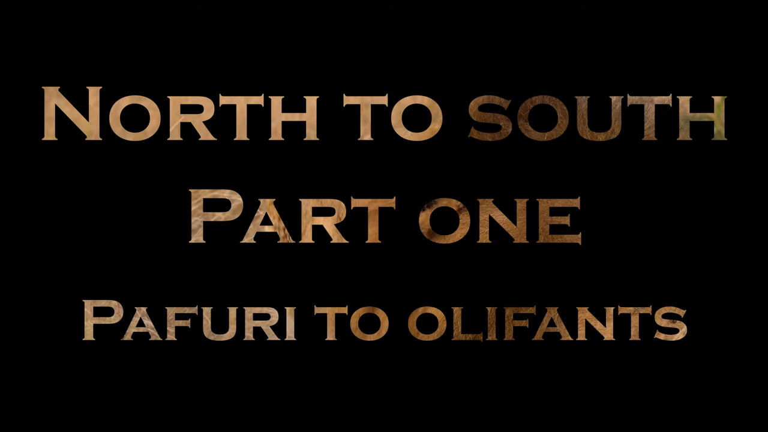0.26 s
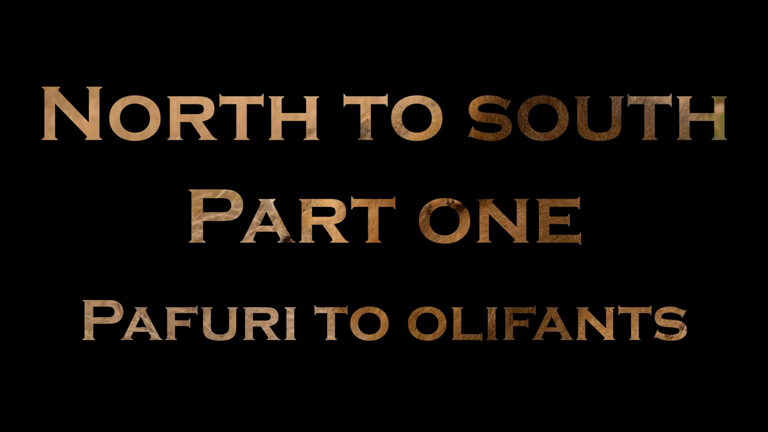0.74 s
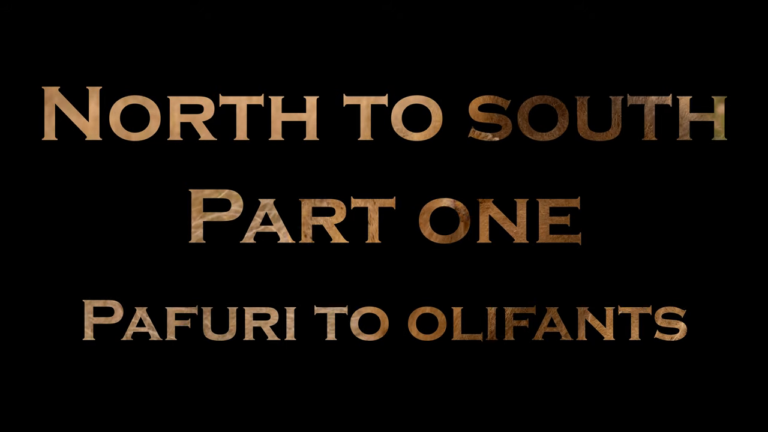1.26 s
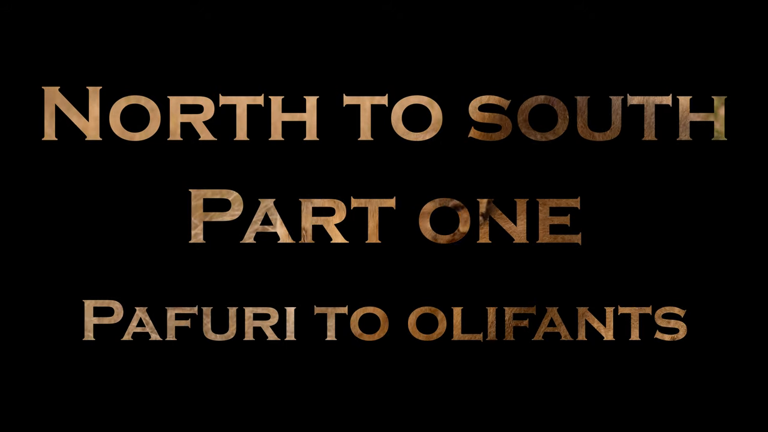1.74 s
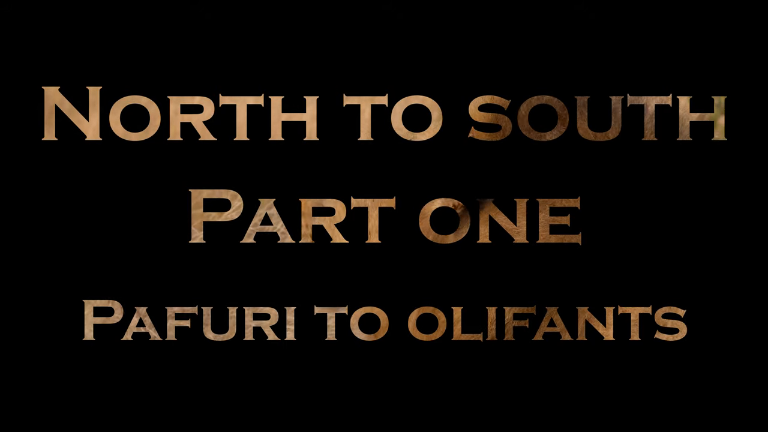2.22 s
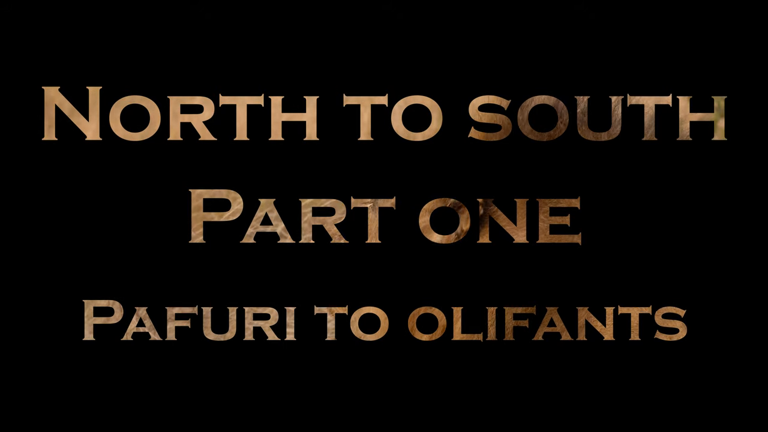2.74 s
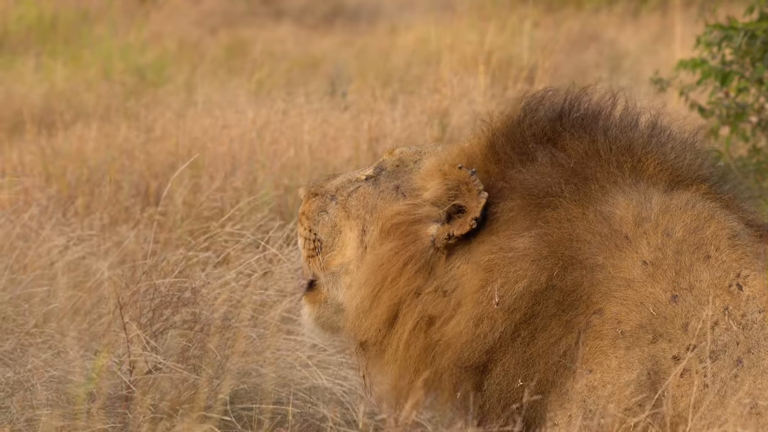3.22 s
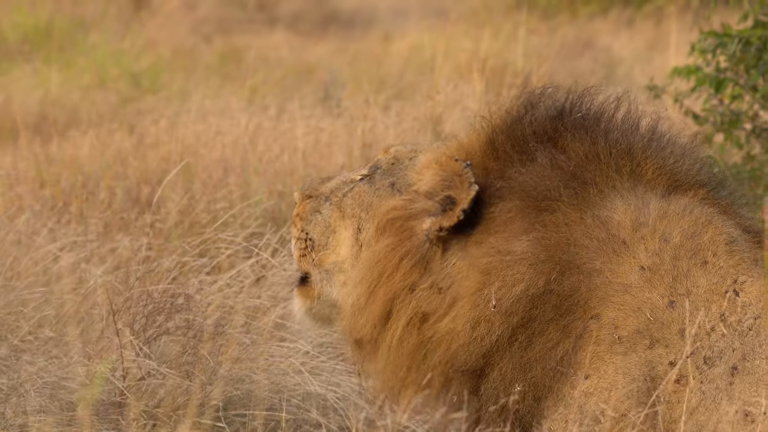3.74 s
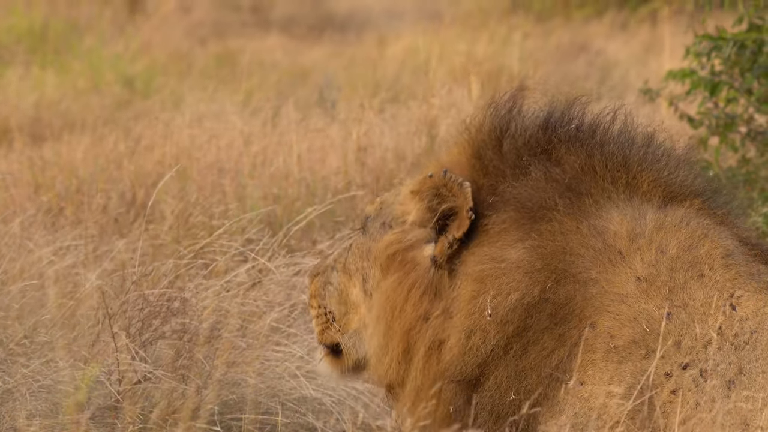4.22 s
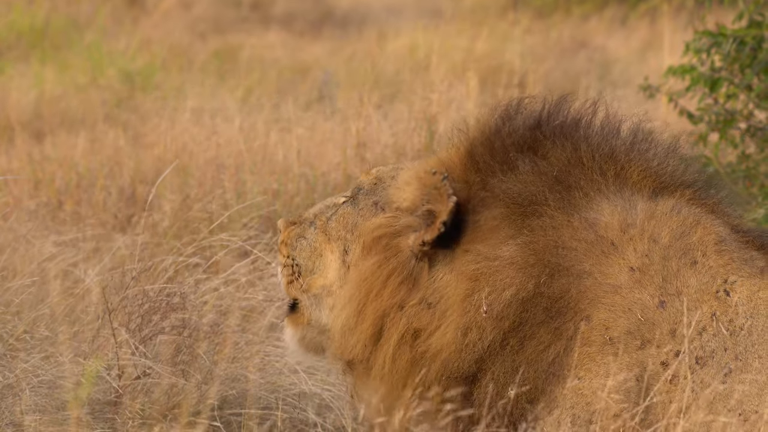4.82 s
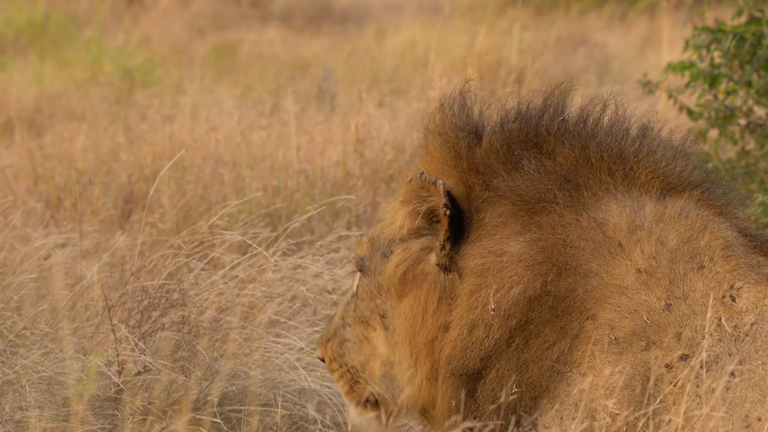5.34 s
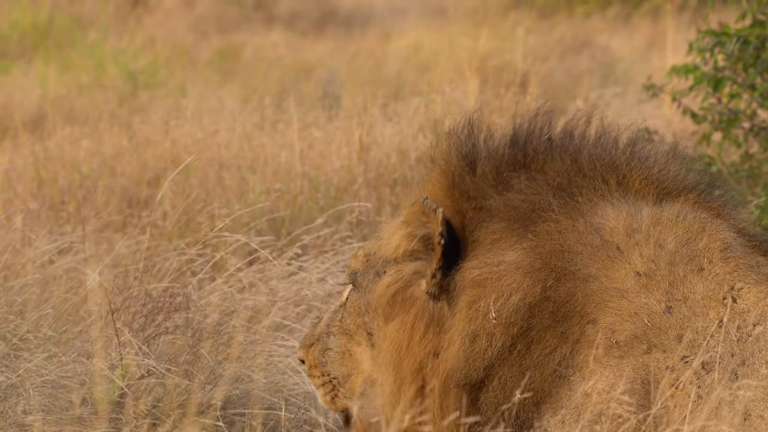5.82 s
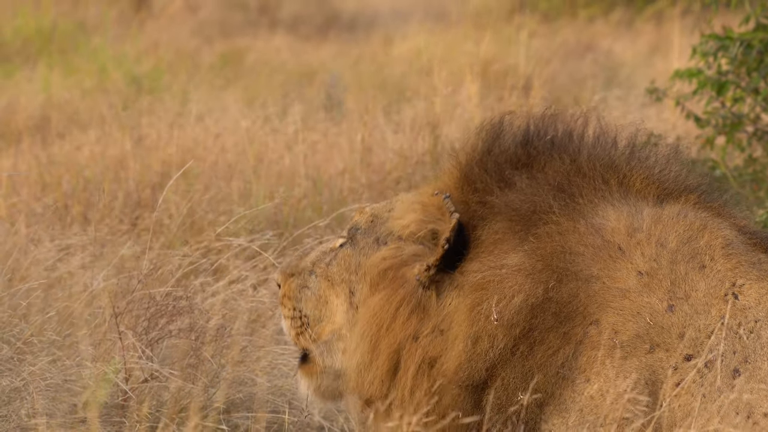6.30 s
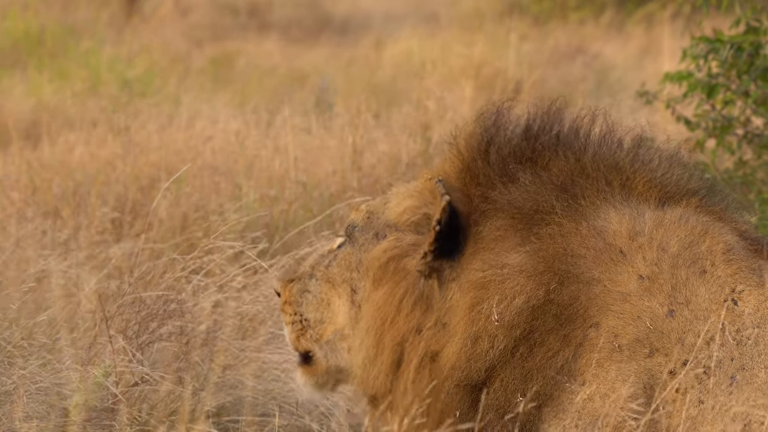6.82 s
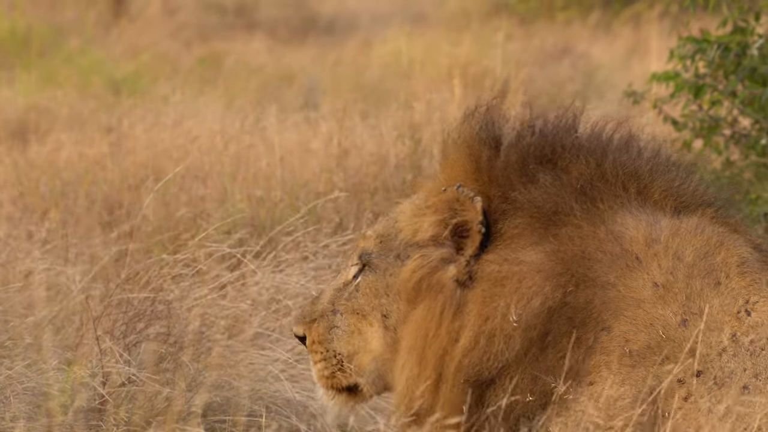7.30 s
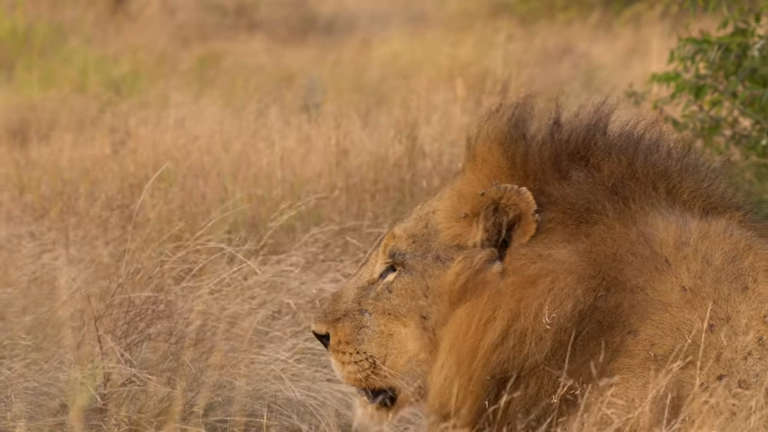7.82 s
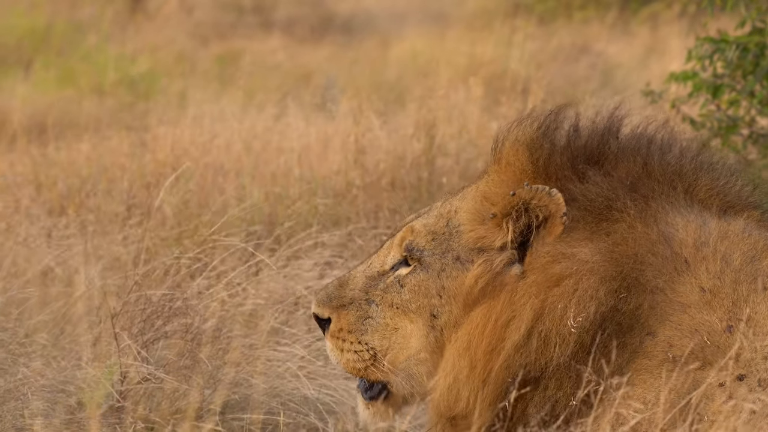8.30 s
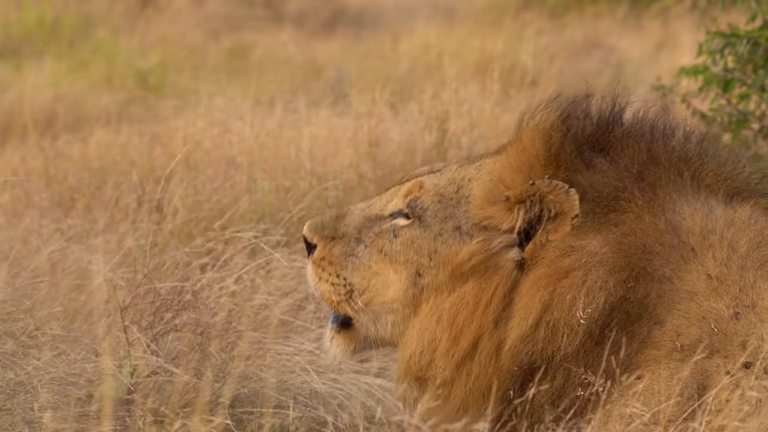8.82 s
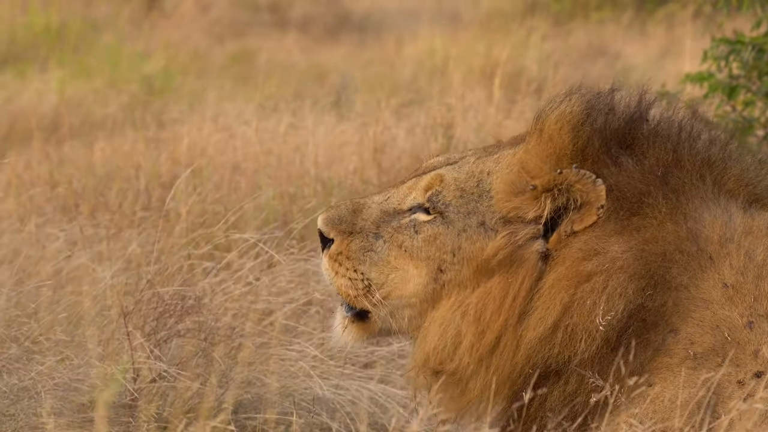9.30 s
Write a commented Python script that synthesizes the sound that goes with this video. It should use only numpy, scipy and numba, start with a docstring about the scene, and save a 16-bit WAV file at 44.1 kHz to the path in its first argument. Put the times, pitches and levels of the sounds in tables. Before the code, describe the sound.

Outdoors in open dry grassland, a male lion a few metres from the microphone calls steadily: a short grunt, then powerful low roars that swell fast, growl roughly and sag in pitch. Softer grunts and faint hoarse breaths fill the gaps. Low wind thumps the microphone now and then over a very faint hiss; late on, one tiny far bird chirp and a dry tick. A soft moan leads into the last rough roar.

```python
"""Open dry grassland: a male lion roars, grunts and once moans softly, a few metres from the microphone.
The vocal folds give a strong fundamental, pulses with doubled periods and a rough growl; resonators of a long
throat, mouth and upper tract filter them; bursts in the growl come with brief, slightly falling sine tones.
Low filtered noise and decaying swings make the wind on the microphone, over a faint bush hiss shaped from noise,
one far chirp of gliding sine and one tick of decaying noise."""
import sys
import numpy as np
from scipy import signal
from scipy.fft import rfft, irfft
from scipy.io import wavfile
from scipy.ndimage import uniform_filter1d
from numba import njit

SR = 44100
rng = np.random.default_rng(int(sys.argv[2]) if len(sys.argv) > 2 else 0)


def wav_record(signal):
    """Record a signal, one row per channel, as 16-bit PCM in the file named by sys.argv[1]."""
    frames = np.transpose(np.atleast_2d(signal))
    bounded = np.clip(frames, -1, 1)
    # unit amplitude maps onto the largest positive 16-bit level
    quanta = np.round(bounded * 32767).astype(np.int16)
    wavfile.write(sys.argv[1], SR, quanta)


N = 421155
TIME = np.arange(N) / SR
ROUGHEST = .86  # roughness 0-1 of the fully cracked voice and of the breaths
THROAT_SAG = -0.58  # change of the throat resonance factor per unit of pitch sag
THROAT_KNEE_DB = -24.5  # the throat fills up at this level of the fundamental


def undb(db):
    """Decibels to amplitude ratio: 20 dB a factor of ten."""
    return 10 ** (np.asarray(db) / 20)


def unit(x, seconds=None):
    """Power normalisation to rms 1, over the whole or over a sliding stretch."""
    power = np.mean(x ** 2) if seconds is None else uniform_filter1d(x ** 2, int(seconds * SR))
    return x / np.sqrt(power + 1e-18)


def curve(rows):
    """Linear interpolation in time of every column after the first, which holds seconds."""
    s, *columns = np.transpose(rows)
    return [np.interp(TIME, s, c) for c in columns]


def walk(rate):
    """Slow random modulation: levels held 1 / rate s and smoothed twice; spread near 1."""
    k = int(SR / rate)
    held = np.repeat(rng.standard_normal(N // k + 1), k)
    return 1.3 * uniform_filter1d(uniform_filter1d(held, k), k)[:N]


def band(x, lo_hz, hi_hz, order=2):
    """Band-pass filtering with a maximally flat pass band."""
    return signal.sosfilt(signal.butter(order, [lo_hz, hi_hz], "band", fs=SR, output="sos"), x)


@njit
def svf(x, hz, width):
    """Damped resonance: a state-variable band-pass with a moving centre, gain 1 at the centre."""
    y, b, l = np.empty(len(x)), 0., 0.
    for i in range(len(x)):
        g, k = np.tan(np.pi * hz[i] / SR), width / hz[i]
        v = (b + g * (x[i] - l)) / (1 + g * (g + k))
        b, l, y[i] = 2 * v - b, l + 2 * g * v, k * v
    return y


def ring(x, modes, stretch=np.ones(N), wander=0):
    """Modal superposition with alternating signs; each centre follows the stretch and wanders alone."""
    out = 0
    for k, (hz, width_hz, db) in enumerate(modes):
        centre = hz * stretch * (np.exp(wander * walk(14)) if wander else 1)
        # two passes leave dark valleys; each is widened to make up for the narrowing
        once = svf(x, centre, 1.44 * width_hz)
        out = out + (-1) ** k * undb(db) * svf(once, centre, 1.44 * width_hz)
    return out


def clicks(phase, size):
    """Impulse excitation: a click at each wrap of the phase, shared between two samples."""
    cycle = np.floor(phase).astype(int)
    at = np.flatnonzero(np.diff(cycle)) + 1
    late = (phase[at] - cycle[at]) / (phase[at] - phase[at - 1])
    out = np.zeros(N)
    out[at - 1] += size[at] * late
    out[at] += size[at] * (1 - late)
    return out


def bush():
    """Stationary coloured noise: the grassland's faint hiss, most alike in both ears in the bass."""
    # spectrum of the hiss, joined on a logarithmic frequency axis: (frequency [Hz], relative level [dB])
    spectrum = [(18, -45.5), (30, -25), (121, 3.5), (285, -20.5), (1180, -19), (1340, -27), (2220, -20.5),
                (3080, -27.5), (3770, -31.5), (12700, -34.5), (16500, -62.5), (22000, -120)]
    bush_db = -72.5  # rms level
    hz = np.fft.rfftfreq(N, 1 / SR) + 1
    colour_hz, colour_db = np.transpose(spectrum)
    colour = undb(np.interp(np.log(hz), np.log(colour_hz), colour_db))
    mid, side = rfft(rng.standard_normal((2, N)))
    width = np.minimum(hz / 500, .7) * np.array([[1], [-1]])
    return undb(bush_db) * unit(irfft(colour * (mid + width * side), N))


def wind():
    """Turbulent pressure on the microphone: low rumble and single buffets, mostly alike in both ports."""
    # level of the rumble ahead of its random gusting: (time [s], level [dB])
    rumble = [(1.2, -72.5), (2.0, -75), (2.5, -67), (4.0, -59.5), (4.3, -55), (4.48, -61), (5.3, -56),
              (5.6, -47), (6.1, -66.5), (7.15, -56.5), (7.4, -70), (7.6, -72), (7.74, -51), (8.08, -70.5),
              (8.36, -50.5), (9.5, -51.5)]
    # single buffets ahead of the low-pass: (time [s], peak level [dB])
    thuds = [(4.154, -32.5), (4.328, -53), (5.332, -44), (5.78, -44), (7.15, -43), (7.205, -28.5),
             (7.26, -36.5), (7.36, -43.5), (7.602, -42.5), (7.659, -45), (7.691, -41), (7.749, -34),
             (7.813, -39.5), (8.11, -49), (8.199, -34.5), (8.251, -22), (8.291, -42), (8.349, -39.5)]
    thud_hz, thud_s = 72.2, 0.015  # middle swing rate [Hz] and decay time [s] of a buffet
    gust = undb(curve(rumble)[0] + 3 * walk(30))
    shared, left, right = (unit(band(rng.standard_normal(N), 25, 120), 0.08) for _ in range(3))
    out = gust * (shared + .5 * np.array([left, right]))
    half = 2000  # samples on each side of a buffet's peak
    t = np.arange(-half, half) / SR
    for (s, db), chance in zip(thuds, rng.standard_normal((len(thuds), 3))):
        # a push of one or two swings, rising in pitch at its peak
        swing = 2 * np.pi * thud_hz * np.exp(0.19 * chance[0]) * t
        swing = swing + chance[1] + 0.97 * np.tanh(t / 0.0025)
        thud = undb(db) * np.exp(-np.abs(t) / thud_s) * np.cos(swing)
        balance = undb(.5 * chance[2] * np.array([[1], [-1]]))
        out[:, int(s * SR) - half:int(s * SR) + half] += thud * balance
    return signal.sosfilt(signal.butter(3, 230, fs=SR, output="sos"), out)


def chirp_and_tick():
    """Frequency modulation makes a far bird's arched note; exponentially damped noise makes one dry tick."""
    # the bird's note: (time [s], frequency [Hz], level [dB])
    note = [(7.82, 3360, -99), (7.84, 3970, -74), (7.85, 3950, -76), (7.865, 2880, -86)]
    tick_s, tick_db = 7.983, -62  # onset [s] and gain [dB] of the tick
    hz, db = curve(note)
    sounding = (TIME > note[0][0]) & (TIME < note[-1][0])
    chirp = np.sin(2 * np.pi * np.cumsum(hz) / SR) * undb(db) * sounding
    tick = rng.standard_normal(N) * (TIME > tick_s) * np.exp(-np.abs(TIME - tick_s) / 0.002)
    return chirp + undb(tick_db) * band(tick, 1300, 8600)


def spread(voice, turn):
    """Directivity and scattering: the bass leans right as the head turns; each ear gets its own returns."""
    # returns from ground and scrub: (low edge [Hz], high edge [Hz], level before band-pass [dB], t60 [s])
    scrub = [(60, 160, -35.5, 3.3), (205, 1500, -21, 0.17), (563, 2500, -8, 0.3), (2000, 3500, -5, 0.067),
             (4000, 21000, -5.5, 0.054)]
    turn_db, turn_hz = 0.72, 400  # lean of the bass in each ear when fully turned [dB], its upper edge [Hz]
    bass = signal.lfilter(*signal.butter(1, turn_hz, fs=SR), voice)
    lean = undb(turn_db * turn * np.array([[-1], [1]])) - 1
    tail = 0
    for lo_hz, hi_hz, db, t60 in scrub:
        decay = np.exp(-np.log(1000) * TIME[:SR] / t60)
        noise = band(rng.standard_normal((2, SR)), lo_hz, hi_hz)
        tail = tail + undb(db) * noise * decay / np.linalg.norm(decay)
    return voice + lean * bass + signal.fftconvolve(voice[None], tail, axes=1)[:, :N]


def bursts_and_tones():
    """Amplitude modulation: gain bumps for the growl, each with a brief soft-edged tone, slightly falling."""
    # (time [s], burst gain [dB], tone frequency [Hz], tone level [dB])
    events = [(0.501, 2.5, 354.3, -23.5), (.56, 1.5, 365.5, -19), (1.011, 3, 306.3, -30.5),
              (1.9, 5, 343.1, -26.5), (1.972, 5.5, 377.5, -30), (2.04, 5.5, 366, -25.5),
              (2.226, 1.5, 399, -40), (3.23, 3, 367, -16), (3.738, 2, 319.4, -23.5),
              (3.843, 0.5, 264.8, -23.5), (4.869, 8.5, 322.2, -20.5), (4.89, 7.5, 688.6, -26.5),
              (4.919, 4.5, 237.2, -19), (4.985, 9.5, 264.9, -20), (5.04, 0.5, 300, -40.5),
              (5.085, 7.5, 308.9, -31), (6.274, 2.5, 340, -40), (6.353, 6, 340.8, -34.5),
              (6.471, 8.5, 376, -25), (6.58, 6.5, 305.6, -20), (6.63, 4.5, 401.8, -25),
              (6.68, 8, 299.6, -28), (6.73, 6, 282, -26.5), (6.799, 10, 410, -40), (6.845, 3.5, 332, -40),
              (8.83, 6.5, 297, -39), (8.928, 7.5, 235.7, -36), (8.97, -1, 229, -22),
              (9.04, 6.5, 241.7, -24.5), (9.125, 3, 326.2, -26.5), (9.201, 3, 346.1, -43),
              (9.26, 4, 395.2, -40.5), (9.31, 1, 267.4, -23), (9.359, 3.5, 295.4, -31.5),
              (9.44, 2.5, 390.5, -40)]
    burst_s, glide = .012, -.03  # spread of a burst [s], share by which a tone bends each way
    bumps_db, tones = np.zeros(N), np.zeros(N)
    t = np.arange(-.08 * SR, .08 * SR) / SR
    for s, db, tone_hz, tone_db in events:
        at = int(s * SR) + np.arange(len(t)) - len(t) // 2
        hz = tone_hz * (1 + glide * np.tanh(t / 0.071))
        bumps_db[at] += db * np.exp(-(t / burst_s) ** 2 / 2)
        swell = undb(tone_db) * np.exp(-(t / 0.02) ** 2 / 2)
        tones[at] += swell * np.sin(2 * np.pi * np.cumsum(hz) / SR)
    return undb(bumps_db), tones


def folds(hz, tone_db, rough, doubling):
    """Self-oscillating folds: a sine fundamental, steady closures, an erratic growl and puffs of air."""
    phase = np.cumsum(hz * (1 + .04 * rough * walk(40))) / SR
    tone = np.sqrt(2) * np.sin(2 * np.pi * phase) * undb(tone_db + 1.5 * rough * walk(30))
    # doubled periods: every other closure is weaker
    steady = clicks(phase, 1 + doubling * (-1.) ** np.floor(phase))
    # the growl: a second, erratic oscillator and air that puffs once a cycle
    erratic_phase = np.cumsum(1.6 * hz * np.exp(.4 * walk(70))) / SR
    erratic = clicks(erratic_phase, undb(4.1 * walk(90)))
    opening = .5 + np.exp(-(phase % 1) / 0.56)
    puff = unit(rng.standard_normal(N) * opening * undb(2.2 * walk(35)))
    growl = unit(erratic) + 1.1 * puff
    return tone, steady, growl, puff


def lion(hz, tone_db, throat_db, rasp_db, rough, doubling, low, mid, high, mouth_db, ring_db, hiss_db):
    """Source-filter principle: fold pulses, growl and air excite the resonances of the vocal tract."""
    # resonances ahead of the stretch factors, all: (centre [Hz], nominal width [Hz], relative level [dB])
    chest_modes = [(58.4, 85, -19.5), (119.4, 68.5, 4.5)]
    throat_modes = [(197, 69, 1), (298, 90.4, -3.5), (353.3, 53, 3), (439.1, 76.7, -2.5)]
    mouth_modes = [(640, 55, -27), (725.4, 41, 5.5), (914, 54, -8), (1068, 65, -13.5)]
    # upper tract: the rasp, the ring above it, and the hiss from behind the teeth
    rasp_modes = [(1374, 96, 0), (1610, 530, -6.5), (2005, 390, -0.5), (2280, 130, -27)]
    ring_modes = [(2780, 170, -4.5), (3160, 130, 0), (3500, 960, -17)]
    hiss_modes = [(4510, 750, -3), (5220, 560, 1), (6630, 540, -3), (7940, 790, -7), (9350, 1200, -15),
                  (11500, 2200, -21.5)]
    tone, steady, growl, puff = folds(hz, tone_db, rough, doubling)
    burst, brief_tones = bursts_and_tones()

    def voiced(modes, rough, stretch, harsh, wander):
        """Power-preserving blend of steady and harsh excitation by roughness, ahead of the bursts."""
        clean = unit(ring(steady, modes, stretch), .12)
        harsh = unit(ring(harsh, modes, stretch, wander), 0.09)
        return np.sqrt(1 - rough) * clean + np.sqrt(rough) * burst * harsh

    body = voiced(throat_modes, rough, low, growl, 0.1)
    body += undb(mouth_db) * voiced(mouth_modes, rough, mid, growl, 0.04)
    flutter = undb(2 * rough * walk(40))
    bright = flutter * voiced(rasp_modes, rough ** .4, high, puff + .3 * growl, .012)
    bright += undb(ring_db) * burst * flutter * unit(ring(puff, ring_modes, high ** 0.8), 0.1)
    # the hiss keeps its colour and jumps most at each burst
    bright += undb(hiss_db - 7) * (burst * flutter) ** 1.5 * unit(ring(puff, hiss_modes), .15)
    # when the folds lose their beat the chest rumbles around the fundamental
    body += undb(2) * rough ** 2 * unit(ring(growl, chest_modes), 0.15)
    return tone + brief_tones + undb(throat_db) * body + undb(rasp_db) * bright


def sing(hz, tone_db, throat_db, sag, rasp_db, rough, doubling, low, mid, high, mouth_db, ring_db, hiss_db, turn):
    """Coupling of pitch and timbre: with sag the voice cracks, resonances shift and the jaw closes."""
    sag_clear, sag_rough = .05, .14  # shares of pitch lost where the crack starts and is complete
    crack = np.clip((sag - sag_clear) / (sag_rough - sag_clear), 0, 1)
    return np.broadcast_arrays(hz, tone_db, throat_db, rasp_db, rough + (ROUGHEST - rough) * crack,
                               doubling * (1 - crack), low + THROAT_SAG * sag, mid, high - .35 * sag,
                               mouth_db - 22 * sag, ring_db, hiss_db - 25 * sag, turn)


def breath(db):
    """Mixed excitation: a faint hoarse breath, rough noise over a weak, low, steady-pitched tone."""
    return sing(hz=91.9, tone_db=db, throat_db=db, sag=0, rasp_db=-15.5, rough=ROUGHEST, doubling=0,
                low=1, mid=1, high=1, mouth_db=-16.5, ring_db=-20, hiss_db=-20, turn=0)


def add_breaths(out):
    """Amplitude envelope of the faint breaths between calls: a quick onset, then a straight slide in dB."""
    # (start [s], end [s], level after the onset [dB], last level [dB])
    breaths = [(1.64, 1.791, -54, -62.5), (2.97, 3.076, -54, -65), (3.971, 4.472, -63.5, -61),
               (5.72, 6.12, -60, -75.5)]
    edge_s = .03
    for start, end, *db in breaths:
        on = (TIME > start) & (TIME < end)
        level_db = np.interp(TIME[on], [start, start + edge_s, end], [db[0] - 11.5, *db])
        out[:, on] = breath(level_db)


def grunt_curve(s, length, hz, last_hz, db, last_db):
    """Piecewise-linear envelope of swell, slide and release: (time [s], pitch [Hz], fundamental [dB])."""
    swell_s, swell_db, scoop = .09, -24.5, .89  # the swell starts this much softer [dB] and lower [factor]
    release_s, release_db = .09, -21
    top = s + swell_s
    return [(s, scoop * hz, db + swell_db), (top, hz, db), (top + length, last_hz, last_db),
            (top + length + release_s, last_hz, last_db + release_db)]


def add_grunts(out):
    """Short phonation: four grunts sag in pitch; the last call, a soft clear moan, rises into the roar."""
    # (start [s], length after the swell [s], pitch [Hz], last pitch [Hz], fundamental [dB], last level [dB],
    # throat over fundamental [dB], rasp over throat [dB], throat resonances [factor], upper resonances [factor])
    grunts = [(.045, .15, 118.8, 102.4, -25.5, -30.5, -4.5, -26, .99, 1),
              (2.67, .13, 101.5, 78.23, -25, -37, -2, -25.5, 0.82, 1.01),
              (4.49, .11, 101.7, 88.42, -28, -30.5, -3, -26, 0.87, 1.01),
              (5.435, .1, 97.83, 88.69, -28, -30, -4.5, -26, .86, 1.01),
              (8.435, .19, 97.1, 101.7, -30, -30, -11, -23, 1, .76)]
    # shared by these calls before sag: (mouth over throat [dB], ring over rasp [dB], hiss setting [dB])
    grunt_voice = (-17.5, -21.5, -14.5)
    throat_steep = 0.23  # extra dB the throat loses per dB under the peak of the swell
    for *shape, throat_db, rasp_db, low, high in grunts:
        rows = grunt_curve(*shape)
        on = (TIME > rows[0][0]) & (TIME < rows[-1][0])
        hz, db = (c[on] for c in curve(rows))
        sag = 1 - hz / np.maximum.accumulate(hz)  # zero while the pitch rises
        filling_db = throat_steep * (np.maximum.accumulate(db) - db.max())
        # outweighs the shift in sing(): the throat resonances rise as the pitch sags
        rising_low = low - 2 * THROAT_SAG * sag
        out[:, on] = sing(hz, db, db + throat_db + filling_db, sag, rasp_db, .13, 0,
                          rising_low, .97, high, *grunt_voice, .08)  # head hardly turned


def add_roars(out):
    """Saturation: the throat grows with the fundamental up to a knee, above which it is full."""
    # one curve a roar: (time [s], pitch [Hz], fundamental [dB])
    roars = [
        [(0.37, 109.9, -46.5), (0.398, 135.1, -33), (0.496, 143.6, -10), (0.646, 146.6, -9.5),
         (0.758, 140.7, -15), (0.968, 105.5, -17), (1.014, 106, -21), (1.096, 97.5, -29.5), (1.3, 109.5, -67.5)],
        [(1.79, 102.3, -54), (1.85, 112.5, -31), (1.942, 134.2, -11), (2.08, 123.2, -16), (2.162, 101.9, -17.5),
         (2.268, 104.9, -33.5), (2.4, 99.9, -58.5)],
        [(3.08, 94.7, -70.5), (3.102, 112.8, -40.5), (3.16, 131.1, -17), (3.228, 142, -14.5),
         (3.298, 144.9, -8.5), (3.498, 144.2, -11.5), (3.632, 126.9, -16), (3.768, 108.9, -16.5),
         (3.852, 95.3, -31), (3.986, 98.6, -50), (4.1, 98.3, -61.5)],
        [(4.7, 100.4, -35), (4.72, 114.1, -33), (4.776, 128.3, -15), (4.98, 121.1, -14.5), (5.106, 103, -32.5),
         (5.25, 108.7, -60)],
        [(6.14, 99.7, -53.5), (6.188, 106.5, -30), (6.26, 126, -19.5), (6.348, 127.3, -11.5),
         (6.398, 120.5, -14), (6.624, 116.1, -16), (6.698, 100.4, -19.5), (6.784, 97.0, -16),
         (6.9, 96.14, -37.5), (7.12, 96.3, -65.5)],
        [(8.71, 101.5, -30), (8.778, 102.6, -28), (8.844, 115.5, -17), (8.932, 123.4, -14),
         (8.966, 115.3, -15.5), (9.156, 108, -15.5), (9.372, 104.7, -20), (9.56, 95.4, -26.5)],
    ]
    # the voice of each roar at its highest pitch: (fullest throat [dB], throat delay [s],
    # rasp over throat [dB], roughness [0-1], doubling [0-1], throat resonances [factor],
    # mouth resonances [factor], upper resonances [factor], mouth over throat [dB], ring over rasp [dB],
    # hiss setting [dB])
    roar_voices = [(-26, -0.0047, -24.5, .25, 0.6, 1.04, 0.992, 1.015, -11, -18, -8.5),
                   (-26, -0.0057, -24.5, .85, 0, 1.006, .95, 1.01, -13, -19, -10),
                   (-27.5, 0.016, -23.5, .25, .55, 1.12, 0.991, 1.006, -9, -16, -9.5),
                   (-28, 0.0082, -29.5, .8, 0.05, 0.901, .96, .98, -15.5, -13, -16),
                   (-29, 0.004, -24.5, .7, 0, 1.006, 1.003, 0.9713, -10, -11, -11),
                   (-30, 0.015, -24, .3, 0.01, .95, 1.044, 0.916, -13.5, -13.5, -3)]
    throat_steep = 1.09  # dB per dB below the knee
    for rows, (full_db, late, *voice) in zip(roars, roar_voices):
        on = (TIME > rows[0][0]) & (TIME < rows[-1][0])
        hz, db = (c[on] for c in curve(rows))
        drive = throat_steep * (np.interp(TIME[on] - late, TIME[on], db) - THROAT_KNEE_DB)
        throat_db = np.maximum(full_db - 2 * np.log1p(np.exp(-drive / 2)), out[2, on])
        out[:, on] = sing(hz, db, throat_db, 1 - hz / hz.max(), *voice, 1)  # head turned right


def controls():
    """Articulation: state of folds, tract and head at every moment; a call overrides what lies under it."""
    rasp_late_s, rasp_steep = 0.018, 0.16  # lag behind the throat; extra dB lost per dB under the knee
    out = np.array(breath(np.full(N, -110.)))  # nearly silent between calls
    add_breaths(out)
    add_grunts(out)
    add_roars(out)
    out = uniform_filter1d(out, size=400, axis=1)
    # row 3, the rasp, turns from a level over the throat into a level of its own
    trailing_db = np.interp(TIME - rasp_late_s, TIME, out[2])
    out[3] += trailing_db + rasp_steep * np.minimum(trailing_db - THROAT_KNEE_DB, 0)
    out[4:6] = out[4:6].clip(0, 1)  # roughness and doubling
    return out


def scene():
    """Linear superposition of the grassland, the wind and the lion."""
    background = bush() + wind() + chirp_and_tick()
    *voice, turn = controls()
    return background + spread(lion(*voice), turn)


def record(dry):
    """Band limiting: a steep low-pass cuts the top; the last milliseconds fade."""
    top_hz = 15600
    fade = np.minimum((N - 1 - np.arange(N)) / (.004 * SR), 1)
    return fade * signal.sosfilt(signal.ellip(10, .2, 100, top_hz, fs=SR, output="sos"), dry)


dry = scene()
out = record(dry)
wav_record(out)
```